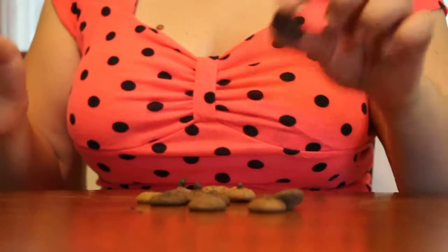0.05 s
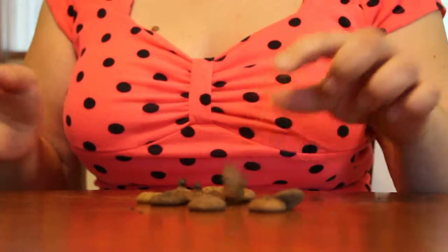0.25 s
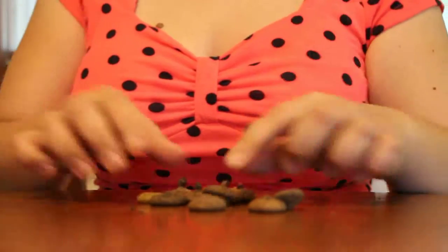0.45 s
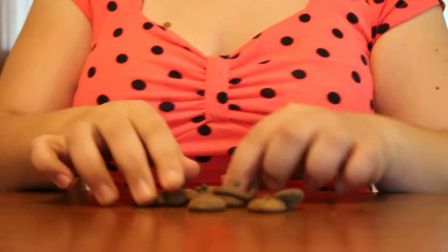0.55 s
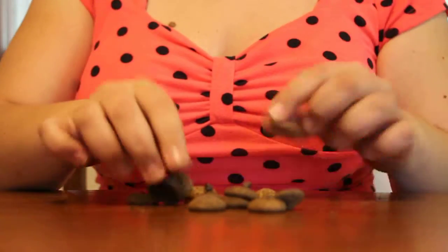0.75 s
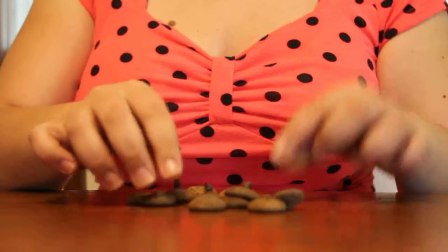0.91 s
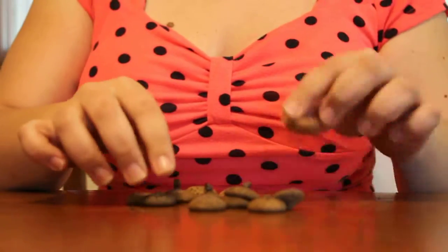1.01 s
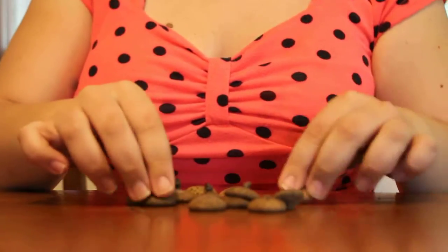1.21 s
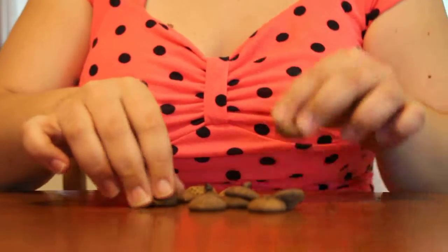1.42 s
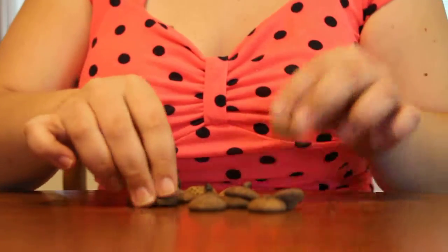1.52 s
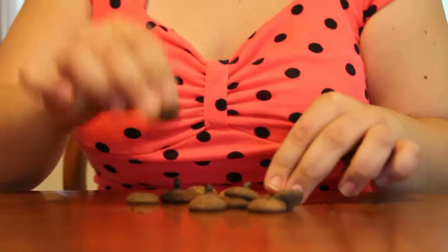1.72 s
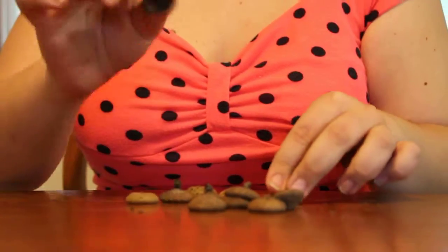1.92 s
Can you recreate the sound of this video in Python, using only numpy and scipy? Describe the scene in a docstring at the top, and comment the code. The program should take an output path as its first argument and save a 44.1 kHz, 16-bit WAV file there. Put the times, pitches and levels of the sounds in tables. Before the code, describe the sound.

Acorn caps clack and tick on a wooden tabletop, with a few soft knocks.

```python
"""Hard acorn caps are dropped, nudged and set down on a wooden table, close to the microphone.
Each touch gives a tick, a very short ring of the cap and a falling chirp as the table top bends.
Caps pressed down by the fingers also knock the whole table, and one cap scrapes briefly along the wood.
The room echoes each sound over a low hum of air."""
import sys
import numpy as np
from scipy import signal
from scipy.fft import rfft, irfft
from scipy.io import wavfile

SR = 44100
rng = np.random.default_rng(int(sys.argv[2]) if len(sys.argv) > 2 else 0)


def inscribe(sig):
    """Save sig as 16-bit PCM at rate SR to the path in sys.argv[1].

    A 1-D sig is mono; a 2-D sig holds one channel per row.
    Samples are clipped to [-1, 1] before scaling.
    """
    pcm = np.round(np.clip(np.atleast_2d(sig).T, -1, 1) * 32767)
    wavfile.write(sys.argv[1], SR, pcm.astype(np.int16))


N = 85995
LEAD = SR // 4  # extra samples before the sound starts


def from_db(db):
    """Turn decibels into a number to multiply by."""
    return 10 ** (np.asarray(db) / 20)


def at_hz(points, hz):
    """Read between a table's rows, giving each octave the same room."""
    p = np.array(points, float)
    return np.interp(np.log(np.maximum(hz, 1)), np.log(p[:, 0]), p[:, 1])


def fade(t, t60):
    """Die away by 60 dB in t60 seconds: the "fade" column of the tables."""
    return np.exp(-np.log(1000) * t / t60)


def unit(x):
    """Scale a sound to an energy of 1."""
    return x / np.sqrt(np.sum(x * x))


def colour(x, points):
    """Make a sound's lows and highs as strong as a table says."""
    n = 2 * len(x)
    gain = from_db(at_hz(points, np.fft.rfftfreq(n, 1 / SR)))
    cepstrum = irfft(np.log(gain))
    # fold the filter so that nothing sounds before its cause
    cepstrum[1:n // 2] *= 2
    cepstrum[n // 2 + 1:] = 0
    return irfft(rfft(x, n) * np.exp(rfft(cepstrum)))[:len(x)]


def burst(points, t60):
    """A short crack in two forms: grainy from close by, smooth as it spreads into the room."""
    t = np.arange(int(t60 * SR) + SR // 50) / SR
    grains = np.sign(rng.random(SR // 4) - .5)[:len(t)]
    click = 1.0 * (t == 0)
    return unit(colour(grains * fade(t, t60), points)), unit(colour(click, points))


def add(out, start_s, sound):
    """Mix a sound in at a given time."""
    i = max(int(start_s * SR) + LEAD, 0)
    out[i:i + len(sound)] += sound[:len(out) - i]


# tone of the air's noise: f/Hz, level/dB
AIR_TONE = [(20, -21), (60, -17), (90, -21), (130, -9), (190, -1.5), (280, -1), (420, -3), (700, -8),
            (1000, -13), (1500, -19), (3000, -25.5), (7000, -29.5), (10000, -35), (16000, -41)]
# humming bands: f/Hz, width/Hz, level/dB
HUM_BANDS = [(178, 8, -59), (295, 14, -64)]
def air(noise_db=-49.5):
    """Steady room noise with two narrow bands that hum."""
    n = LEAD + N
    hz = np.fft.rfftfreq(n, 1 / SR)
    out = from_db(noise_db) * unit(colour(rng.standard_normal(n), AIR_TONE))
    for centre_hz, width_hz, db in HUM_BANDS:
        peak = 1 / (1 + (2 * (hz - centre_hz) / width_hz) ** 2)
        out += from_db(db) * unit(irfft(rfft(rng.standard_normal(n)) * peak, n))
    return out * np.sqrt(n)


# the room's lingering sound: f/Hz, level/dB, fade/s
ROOM_TAIL = [(98, 4, 0.85), (300, 1.5, 0.59), (1000, 2.5, 0.46), (2000, -0.5, 0.4), (3000, 2.5, 0.33),
             (4200, -1.5, 0.52), (6500, 0, 0.38), (11000, -5.5, 0.31), (16000, -3.5, .33)]
# echoes from near walls: t/s, level/dB
WALL_ECHOES = [(.0125, -17), (.0155, -15), (.0245, -18), (.034, -19)]
def room(x, delay_s=0.0044, rise_s=0.0013):
    """Sound bounces off the walls: a few echoes and a smooth tail in which the lows last longest."""
    t, hz = np.arange(SR) / SR, np.fft.rfftfreq(SR, 1 / SR)
    white = np.exp(2j * np.pi * rng.random(len(hz))) * np.sqrt(SR)
    onset = 1 - np.exp(-np.maximum(t - delay_s, 0) / rise_s)
    centres = np.array(ROOM_TAIL)[:, 0]
    response = np.zeros(SR)
    for (_, db, t60), share in zip(ROOM_TAIL, np.eye(len(ROOM_TAIL))):
        band = irfft(white * at_hz(np.c_[centres, share], hz), SR)
        response += from_db(db) * band * unit(onset * fade(t, t60))
    for s, db in WALL_ECHOES:
        response[int(s * SR)] += from_db(db)
    return signal.fftconvolve(x, response)[:len(x)]


# loudness of the sliding cap: t/s, level/dB
SLIDE_LEVEL = [(.57, -50), (.585, -42), (.62, -47), (.655, -45.5), (.685, -77), (.71, -77)]
# tone of its scrape: f/Hz, level/dB
SCRAPE_TONE = [(100, -14), (300, 2), (1400, -2), (3000, -3.5), (6000, -15), (11000, -19), (16000, -24)]
def slide(slips_per_s=2500):
    """A sliding cap's scaly rim catches on the wood grain in many tiny slips."""
    n = LEAD + N
    t = (np.arange(n) - LEAD) / SR
    slips = (rng.random(n) < slips_per_s / SR) * rng.standard_normal(n)
    level_db = np.interp(t, *np.transpose(SLIDE_LEVEL), left=-200, right=-200)
    return from_db(level_db) * unit(colour(slips, SCRAPE_TONE)) * np.sqrt(n)


# slow swings of the table's frame: f/Hz, level/dB, fade/s
FRAME_NOTES = [(56.7, 0.5, .38), (121.6, -3, .25)]
# notes the table top rings with: f/Hz, level/dB, fade/s
BOARD_NOTES = [(197.9, -14.5, 0.44), (250, -11.5, 0.37), (348, -19.5, 0.41), (386.3, -9.5, 0.32),
               (432.3, -12.5, 0.38), (545.6, -11.5, 0.18), (642, -7.5, 0.21), (728, -6.5, 0.23),
               (793, -9, 0.28), (1011, -3.5, 0.16), (1054, -5, 0.23), (1076.4, 2, 0.063),
               (1104, -10.5, 0.12), (1418, -10, 0.14), (1500, -19, 0.083), (1832, -2.5, 0.1),
               (1870, 0.5, 0.041)]
# tone of the knock: f/Hz, level/dB
KNOCK_TONE = [(40, -21), (80, -14), (130, 1.5), (230, 0.5), (450, -1.5), (750, 3.5), (1100, 1), (1900, -7),
              (2500, -26.5), (6000, -16), (12000, -34.5)]
# fingers press a cap down: t/s, knock level/dB, thump level/dB
FINGER_PRESSES = [(0.58, -37, -59), (0.8873, -26.5, -45), (1.1632, -25, -46), (1.6375, -20, -37)]
def table_knocks(knock_gain_db=16.5, board_gain_db=-3, board_rise_s=0.00074, thump_rise_s=0.035):
    """Each press knocks the wood, sets the table top ringing and makes the frame thump."""
    near, to_room = np.zeros((2, LEAD + N))
    t = np.arange(SR // 2) / SR
    thump = sum(from_db(db) * np.sin(2 * np.pi * hz * t) * fade(t, t60) for hz, db, t60 in FRAME_NOTES)
    thump *= 1 - np.exp(-t / thump_rise_s)
    for s, knock_db, thump_db in FINGER_PRESSES:
        for out, knock in zip((near, to_room), burst(KNOCK_TONE, t60=0.041)):
            add(out, s, from_db(knock_db + knock_gain_db) * knock)
        board = np.zeros(len(t))
        for hz, db, t60 in BOARD_NOTES:
            strength = from_db(db + rng.normal(0, 1))
            board += strength * np.sin(2 * np.pi * (hz * t + rng.random())) * fade(t, t60)
        board *= 1 - np.exp(-t / board_rise_s)
        add(near, s, from_db(knock_db + board_gain_db) * board + from_db(thump_db) * thump)
    return np.array([near, to_room])


# paths through the wood, direct and from the edges: typical travel t/s at 1 kHz, level/dB
WOOD_PATHS = [(.0012, -3), (.0058, 0), (.0095, -7)]
# tone of the chirp: f/Hz, level/dB
CHIRP_TONE = [(50, -24), (100, -20.5), (200, -4.5), (400, 0.5), (750, -1.5), (1100, 4), (1900, 3.5),
              (3000, -2.5), (5000, -11.5), (12000, -30)]
def wood_chirp():
    """A tap bends the table top; high ripples outrun low ones, so it arrives as a falling chirp."""
    n = 2048
    hz = np.fft.rfftfreq(n, 1 / SR)
    arrivals = 0
    for s, db in WOOD_PATHS:
        travel_s = s * rng.uniform(.85, 1.15)  # each tap lands on a different spot
        arrivals += from_db(db) * np.exp(-4j * np.pi * travel_s * np.sqrt(1000 * hz))
    fade_out = np.linspace(1, 0, n) ** 2
    return unit(colour(irfft(arrivals) * fade_out, CHIRP_TONE))


# notes a cap rings with: multiple of its pitch, level/dB, fade/s
CAP_NOTES = [(.7, -2, 0.0053), (1, 3.5, 0.0055), (1.16, -2.5, 0.0057), (1.6, -8.5, 0.0044),
             (2.2, -16.5, 0.004), (3.3, -33.5, 0.015)]
# tone of the rim's tick: f/Hz, level/dB
TICK_TONE = [(80, -44.5), (300, -11.5), (1000, -7), (2200, 4.5), (3300, 2.5), (5200, 7), (7500, 1.5),
             (10000, -3), (12500, -2.5), (16000, -18.5)]
# a cap touches the table or another cap:
# t/s, ring level/dB, pitch f/Hz, tick level/dB, tick brightness/(dB per octave), chirp level/dB
CAP_TOUCHES = [ (-.04, -19, 2550, -15, 5, -16), (.0005, -31, 2100, -40, -1, -23.5),
               (.008, -30, 2170, -39, 3, -33), (0.0531, -18.5, 2230, -25, 11, -23),
               (0.092, -21, 2020, -37, 4, -24.5), (.095, -27, 2400, -44, -6, -39),
               (.113, -51, 3000, -35, 8, -48), (.128, -27.5, 2100, -52, 0, -35),
               (0.216, 4, 3650, 2, -1.5, -5.5), (0.2403, -33, 3630, -8, -0.5, -17.5),
               (.249, -11, 2900, -10.5, 3, -14.5), (0.3266, -15, 2760, -19, -5, -14.5),
               (.3305, -21, 2000, -36, 2, -22), (0.4052, -24.5, 2570, -24.5, -7.5, -22.5),
               (.578, -24.5, 2680, -22.5, -3.5, -21), (0.5821, -32, 3340, -37, 6, -49),
               (0.6057, -27, 3340, -47, -8, -36), (.622, -34, 2600, -47, -1, -23),
               (.647, -45, 3000, -38, 5, -29.5), (0.7447, -30.5, 3000, -51, 0, -31.5),
               (.757, -38, 3350, -55, 5, -48), (.798, -26.5, 2050, -53, -6, -27),
               (.813, -35, 2370, -56, 3, -27.5), (0.8404, -44, 2400, -52, -7, -45),
               (0.8791, -32, 2850, -33, -6, -25), (0.885, -27, 3800, -35, -12, -18.5),
               (0.888, -19.5, 3100, -18.5, -7, -18), (0.903, -21, 2710, -28, -6, -49),
               (0.907, -16.5, 2700, -26, 2, -19), (.911, -18.5, 4480, -10, -4, -22),
               (0.922, -21.5, 4700, -30, -15, -21), (0.9279, -18.5, 3070, -32, -3, -22.5),
               (0.9319, -23.5, 4730, -43, 12, -37), (.958, -22.5, 3930, -33, -12, -25.5),
               (.966, -23, 3200, -25.5, -7, -24), (1.1635, -27.5, 4190, -25, -2.5, -18),
               (1.1687, -29, 3830, -40, -3, -22.5), (1.1725, -26, 4230, -26, -5, -41),
               (1.6356, -18.5, 3120, -25.5, -10, -19), (1.638, -19.5, 4200, -16.5, 2, -16)]
def caps(tick_gain_db=4.5, chirp_gain_db=11, bright_above_hz=3500, low_cut_hz=350, ring_to_room_db=-14):
    """At each touch the hard cap rings, its rim ticks and the wood chirps."""
    rings, near, to_room = np.zeros((3, LEAD + N))
    t = np.arange(SR // 70) / SR
    for s, ring_db, pitch_hz, tick_db, brightness, chirp_db in CAP_TOUCHES:
        ring = sum(from_db(db) * np.sin(2 * np.pi * ratio * pitch_hz * t) * fade(t, t60) * (-1) ** k
                   for k, (ratio, db, t60) in enumerate(CAP_NOTES))
        add(rings, s, from_db(ring_db) * ring)
        tone = [(hz, db + brightness * max(np.log2(hz / bright_above_hz), 0)) for hz, db in TICK_TONE]
        for out, tick in zip((near, to_room), burst(tone, t60=0.011)):
            add(out, s, from_db(tick_db + tick_gain_db) * tick)
            add(out, s, from_db(chirp_db + chirp_gain_db) * wood_chirp())
    low_cut = signal.butter(2, low_cut_hz, "high", fs=SR, output="sos")
    rings = signal.sosfilt(low_cut, rings + 1e-18)
    return np.array([near + rings, to_room + from_db(ring_to_room_db) * rings])


def scene():
    """The caps and the table, heard close by and echoed by the room, over the air's hum."""
    near, to_room = caps() + table_knocks() + slide()
    return (near + room(to_room) + air())[None, LEAD:]


def record(dry, cutoff_hz=16300, overload=.68):
    """The hardest clack overloads the microphone, and the very highest sounds are cut."""
    high_cut = signal.ellip(10, .1, 80, cutoff_hz, fs=SR, output="sos")
    heard = signal.sosfilt(high_cut, dry)
    squashed = heard / (1 + (heard / overload) ** 6) ** (1 / 6)
    return signal.sosfilt(high_cut, squashed)


dry = scene()
out = record(dry)
inscribe(out)
```